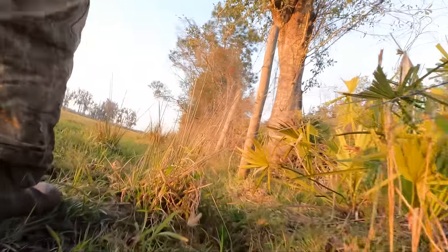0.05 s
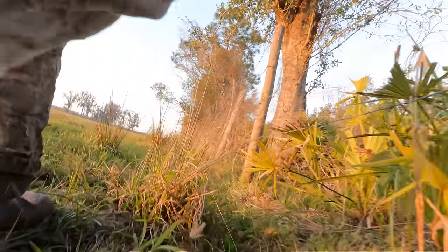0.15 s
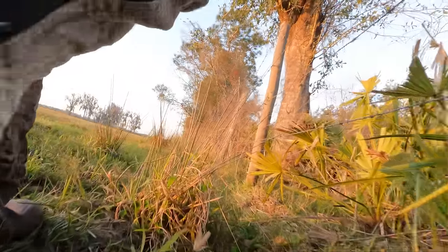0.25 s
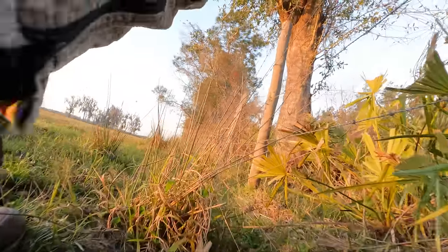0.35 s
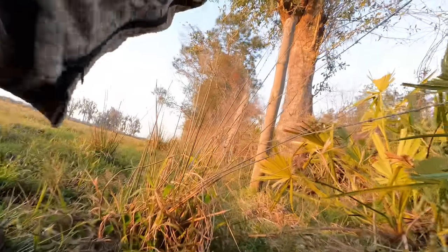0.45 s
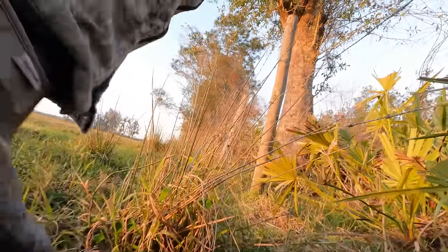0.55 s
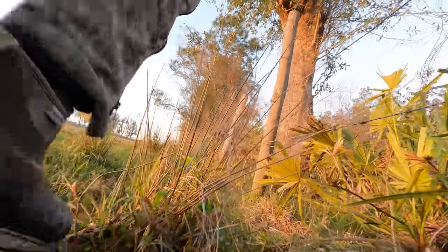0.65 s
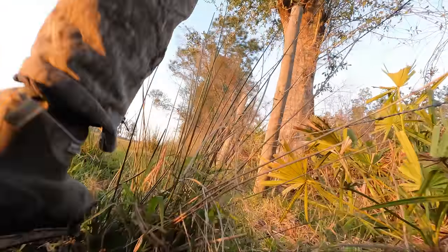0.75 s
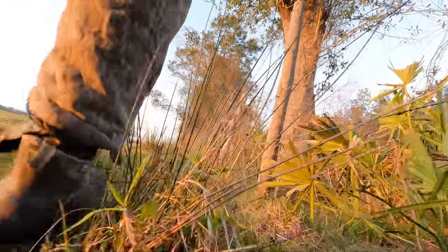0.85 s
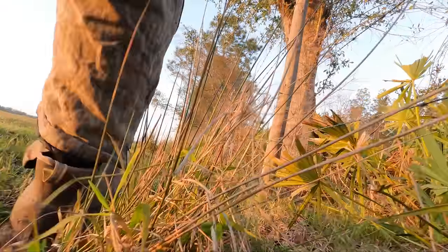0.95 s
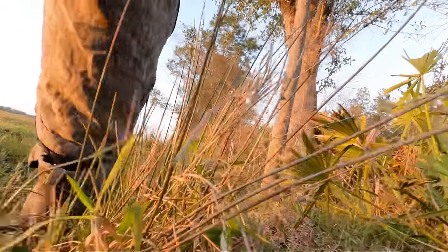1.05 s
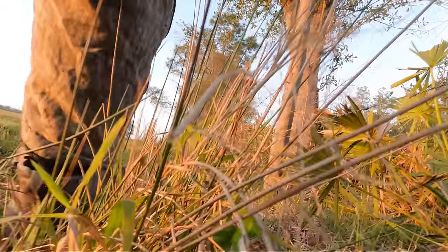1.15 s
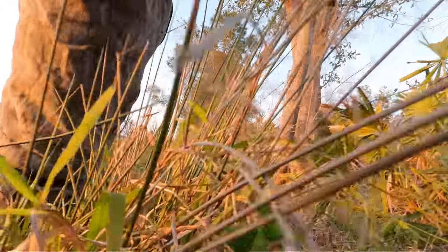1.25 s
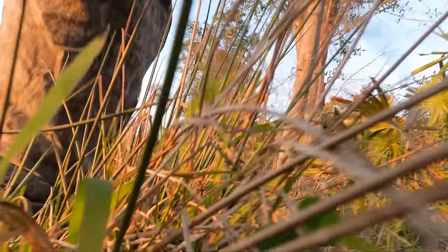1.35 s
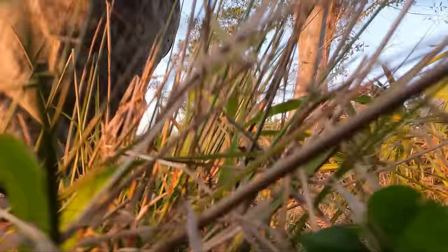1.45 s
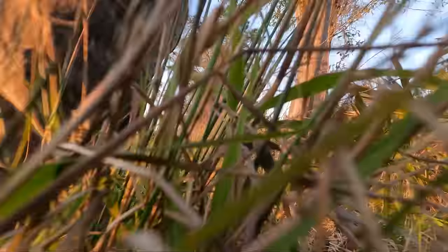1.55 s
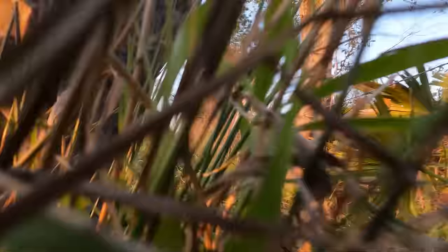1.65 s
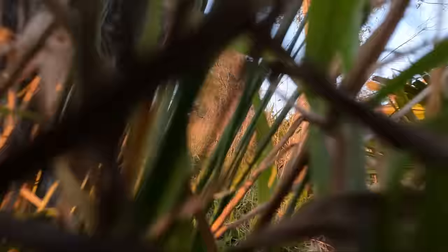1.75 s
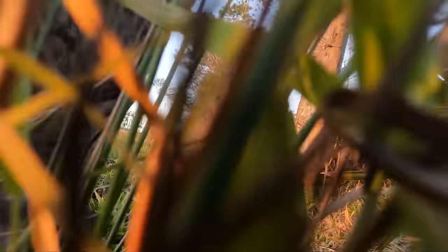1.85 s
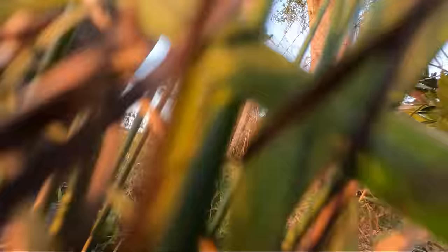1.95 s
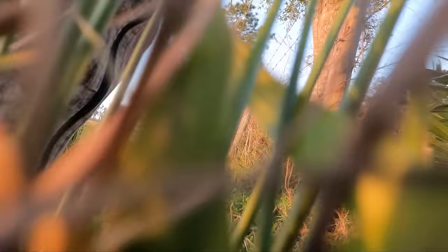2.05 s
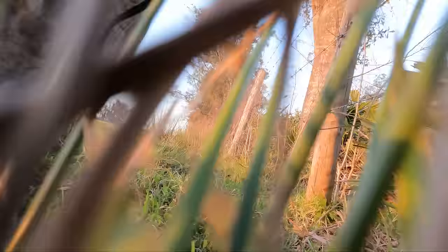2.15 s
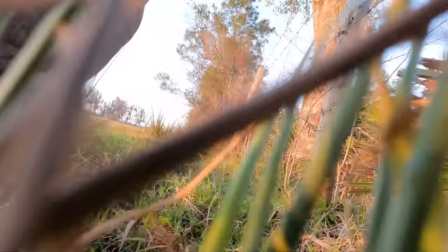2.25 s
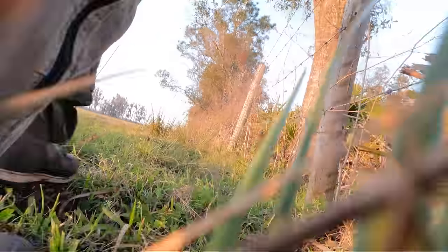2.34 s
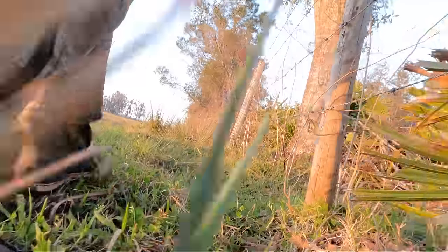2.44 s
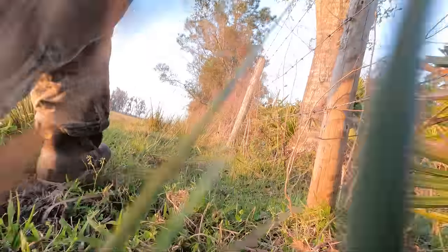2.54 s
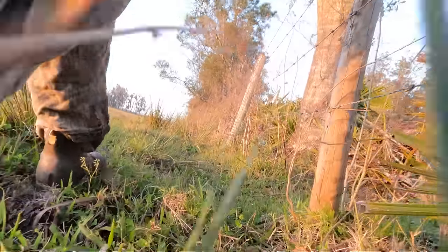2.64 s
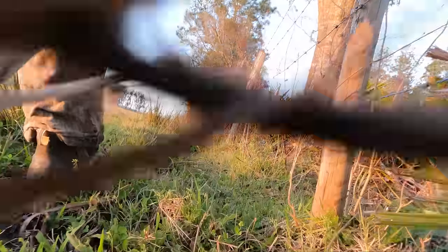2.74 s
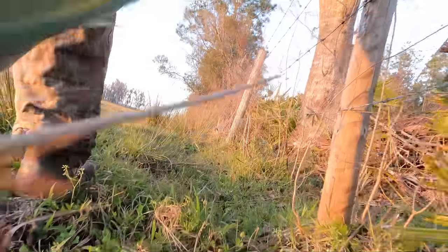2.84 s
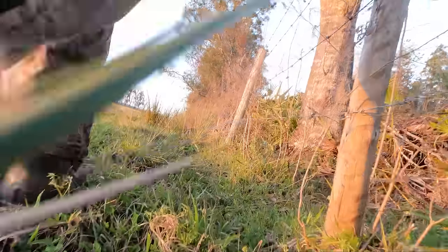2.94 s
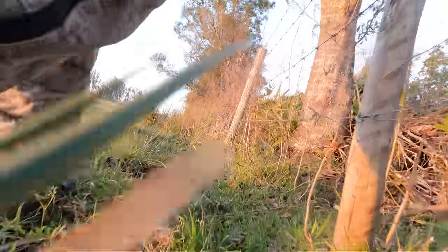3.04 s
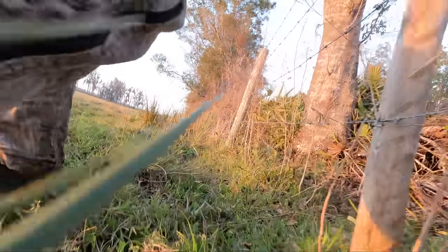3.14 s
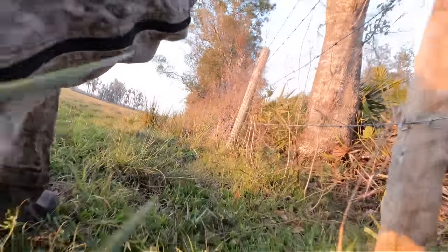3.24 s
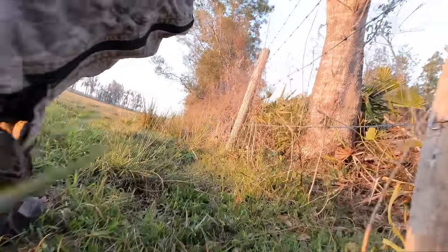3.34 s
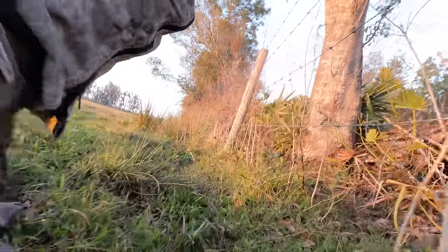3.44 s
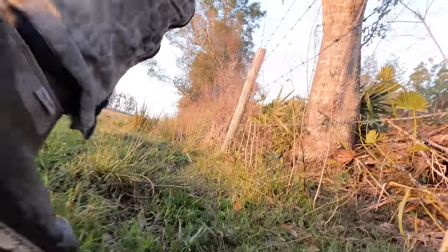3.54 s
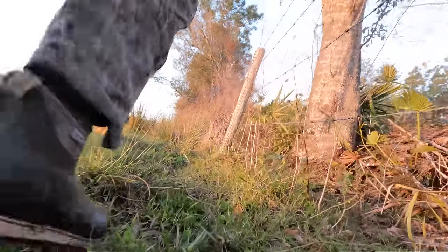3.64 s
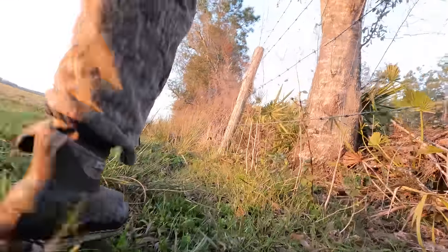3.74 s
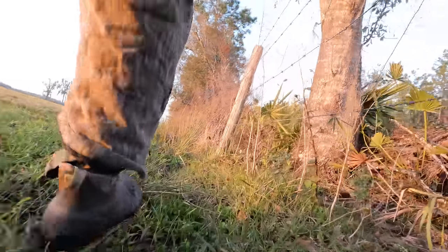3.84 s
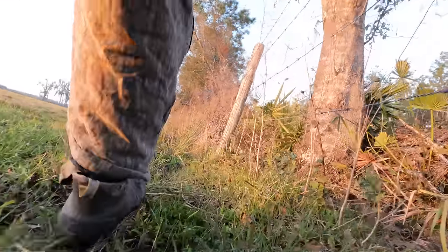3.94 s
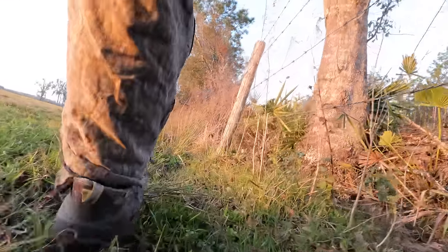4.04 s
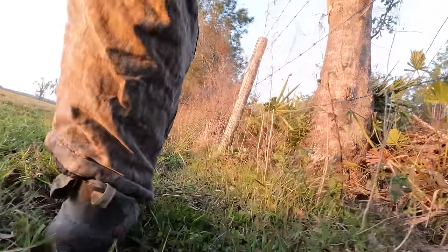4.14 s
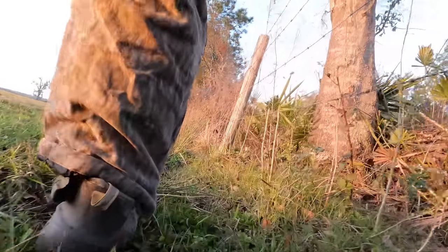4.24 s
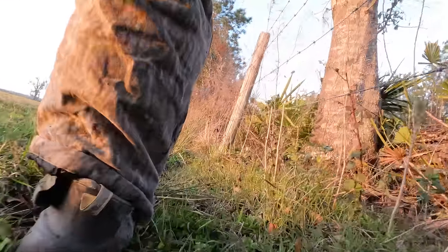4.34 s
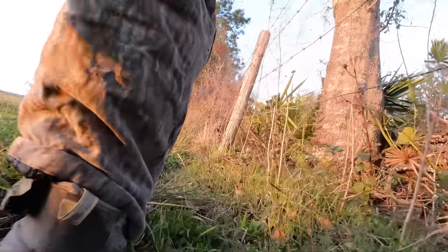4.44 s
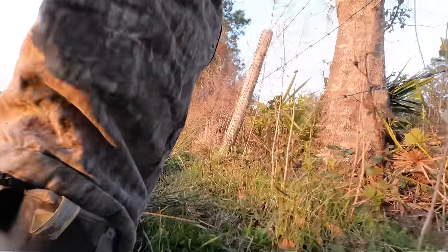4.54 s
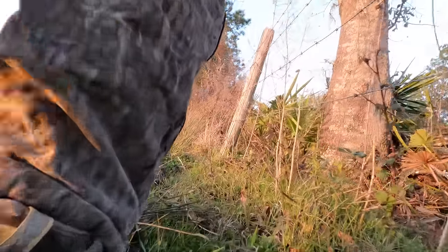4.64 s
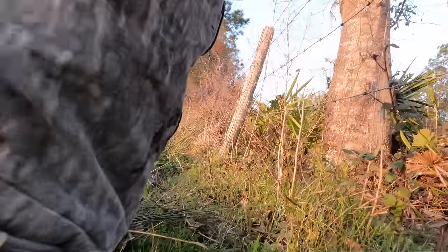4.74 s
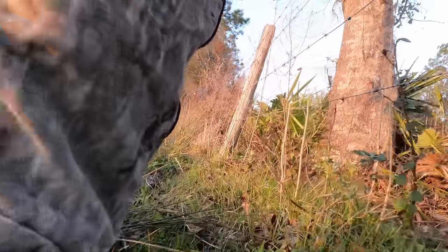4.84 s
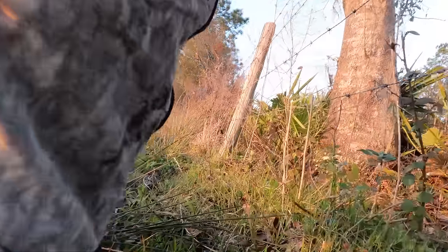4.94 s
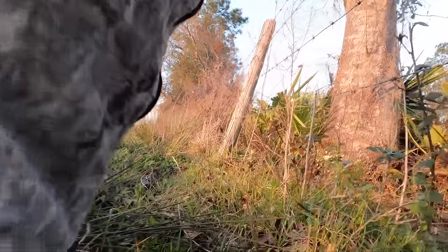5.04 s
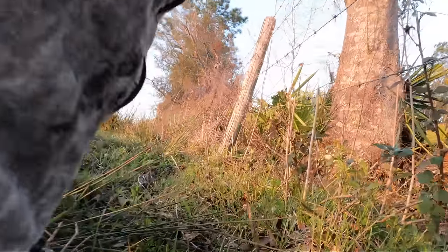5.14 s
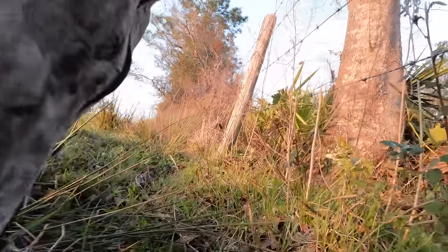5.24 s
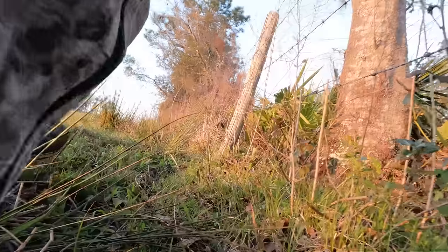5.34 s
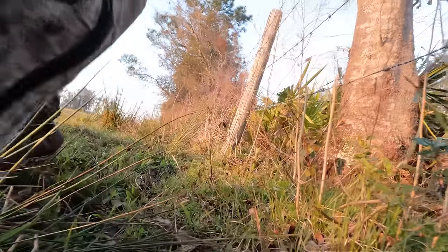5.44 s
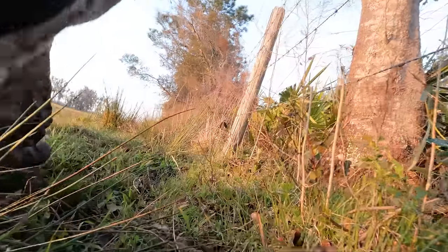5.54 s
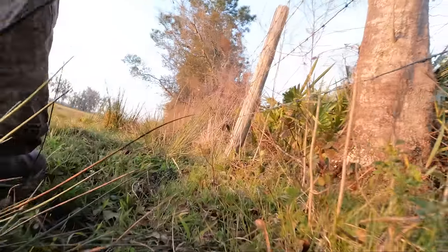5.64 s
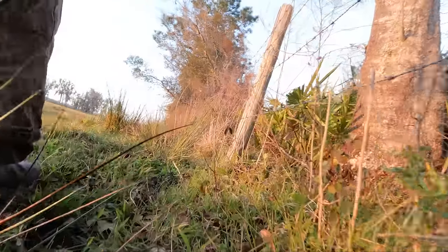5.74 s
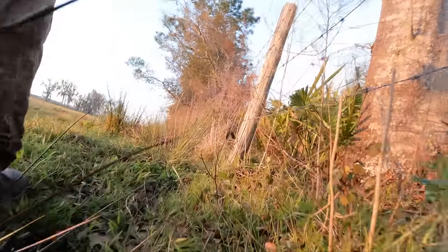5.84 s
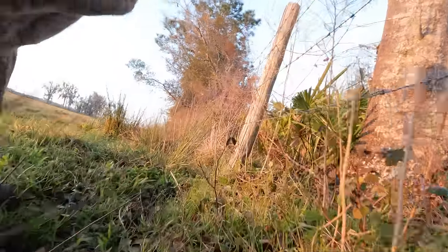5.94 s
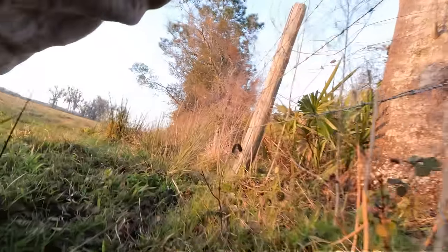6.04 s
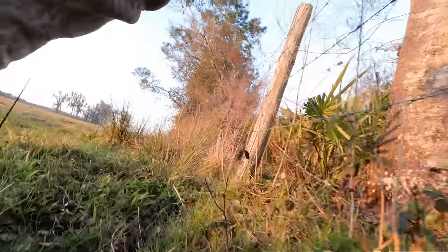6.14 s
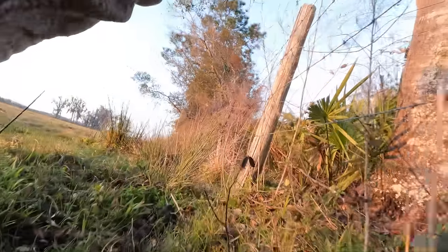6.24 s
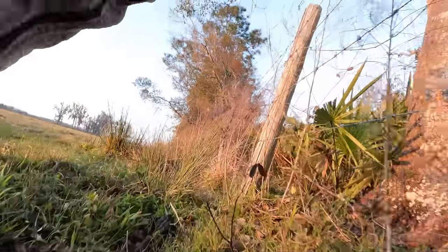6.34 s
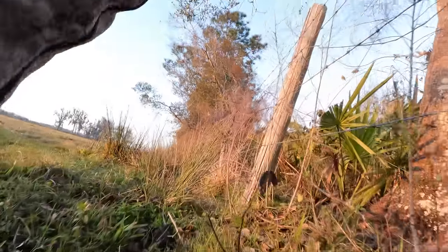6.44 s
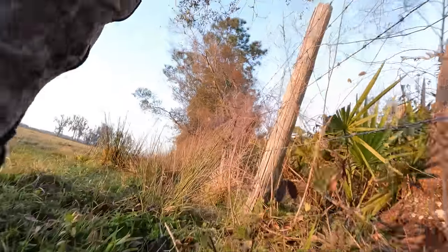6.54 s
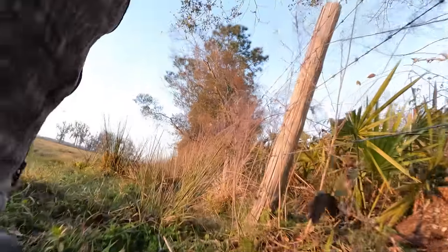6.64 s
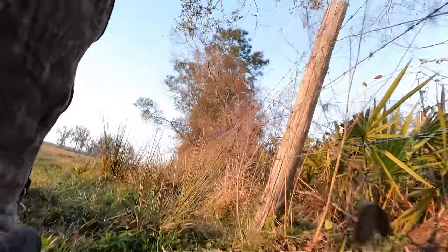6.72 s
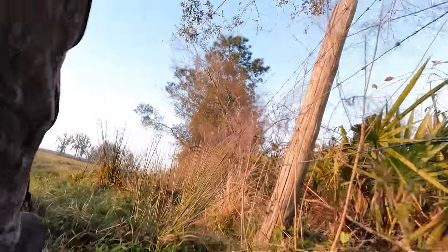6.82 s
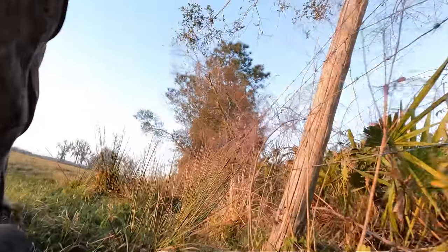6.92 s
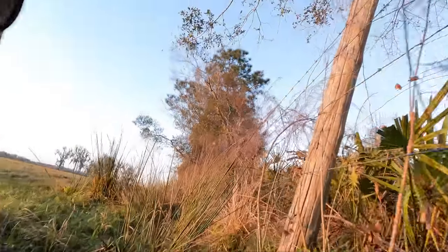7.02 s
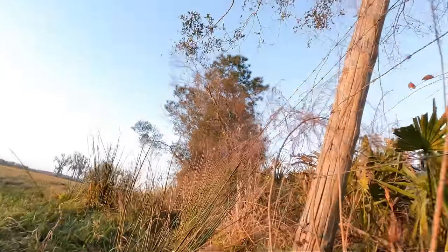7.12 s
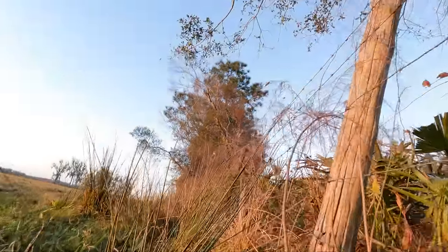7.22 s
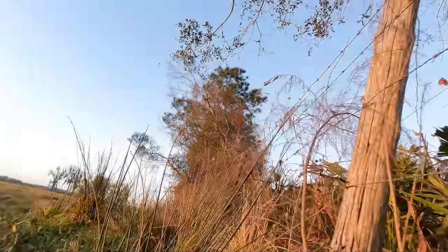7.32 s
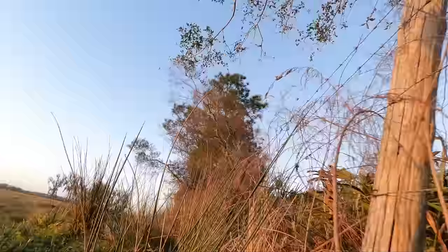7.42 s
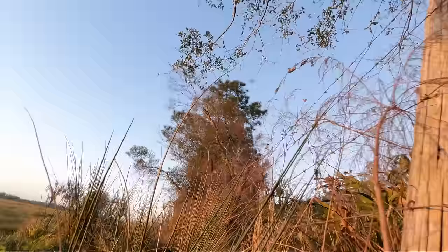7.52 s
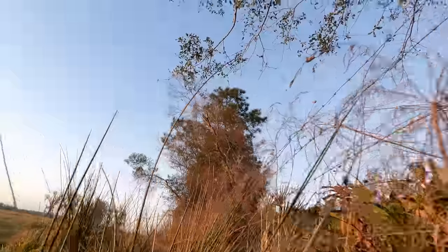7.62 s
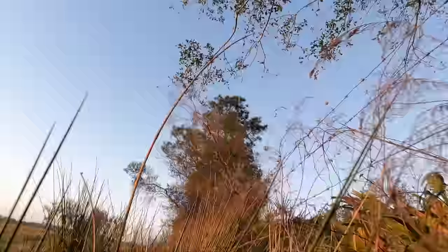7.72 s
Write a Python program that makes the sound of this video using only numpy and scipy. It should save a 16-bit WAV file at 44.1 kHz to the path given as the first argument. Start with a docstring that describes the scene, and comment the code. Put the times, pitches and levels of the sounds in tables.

```python
"""Walking through grass and brush

Someone in boots crosses a pasture, carrying a camera on a pole just above the ground. Grass and
trouser cloth swish as they catch and slip, stems scrape, flick and knock on the housing, and boots
thud on the turf. A thicket drags across the housing and shakes the pole. A low drone, like a far
engine, and a faint hiss lie under it all; the microphone is dull above 7 kHz."""
import sys
import numpy as np
from scipy import signal
from scipy.fft import rfft, irfft, next_fast_len
from scipy.io import wavfile

SR = 44100
rng = np.random.default_rng(int(sys.argv[2]) if len(sys.argv) > 2 else 0)


def store_wav(level_fs):
    """Save 16-bit WAV to argv[1]."""
    pcm = np.round(np.clip(np.atleast_2d(level_fs), -1, 1) * 32767)
    wavfile.write(sys.argv[1], SR, pcm.T.astype(np.int16))


N = 343053
T = np.arange(N) / SR
FFT_SIZE = next_fast_len(N)
FREQS = np.maximum(np.fft.rfftfreq(FFT_SIZE, 1 / SR), 1)

# The two tones of the drone: (pitch [Hz], level [dB])
DRONE_TONES = [(37.7, -37), (75.4, -53)]
# Tone colour of the open air: (frequency [Hz], relative level [dB])
AIR_COLOUR = [(35, -28), (60, -2.5), (114, 2.5), (129, -21), (348, -26), (465, -28), (1420, -27),
              (4170, -52.5), (8420, -64.5), (10900, -84), (18500, -120)]
# Tone colour of rubbing grass: (frequency [Hz], relative level [dB])
GRASS_COLOUR = [(130, -0.5), (300, -4), (700, -7.5), (1000, -8.5), (1650, -8.5), (2300, -11.5), (3200, -15),
                (3900, -16.5), (4700, -23), (5600, -30), (6250, -27.5), (7000, -30), (7900, -34.5),
                (8700, -39.5)]
# Tufts and trouser cloth sweeping past. Body is the lows and crispness the highs, relative to the level:
# (peak time [s], rise [s], fall [s], level [dB], body [dB], crispness [dB])
SWISHES = [(.004,.087,0.21,-47,2.5,-4.5),(.186,0.11,0.13,-43,-6,-8.5),(.297,0.069,0.15,-50.5,7,-3.5),(.445,0.09,0.087,-48,4,-8.5),(.863,0.088,0.038,-41,3,-10),(.978,0.1,0.32,-45,-5,-2),(1.119,0.056,0.074,-38.5,-0.5,0.5),(1.486,0.12,0.074,-36.5,0.5,-5),(3.16,.015,0.11,-33.5,-4.5,-10),(3.435,.106,.065,-37,-6,-4),(3.853,.28,0.091,-42,1,-5.5),(4.079,0.085,0.13,-42.5,4,-2.5),(4.3,0.15,0.12,-41,1.5,-3),(4.5,0.13,0.47,-43.5,-3,-6),(4.7,0.067,.14,-40,-2.5,-1),(5.153,0.18,0.34,-46.5,0,-5.5),(5.658,0.19,0.72,-48,-8,-6.5),(5.951,0.15,0.081,-46,4,1),(6.11,0.074,0.49,-40.5,-3.5,-6),(6.285,0.037,0.091,-38.5,-8,1),(6.335,.04,0.11,-39.5,4.5,-3.5),(6.565,0.35,0.09,-48.5,2.5,-10),(6.72,0.051,0.096,-43,1.5,-9),(6.941,0.015,0.17,-37.5,1,-4.5),(7.064,0.036,0.074,-38,0,3),(7.22,0.046,.1,-37,2,-0.5),(7.48,0.079,.11,-42.5,2.5,-4),(7.76,0.077,0.11,-53.5,1.5,-6)]
# The thicket dragging over the housing: (time [s], level [dB], body [dB], crispness [dB])
THICKET_DRAG = [(1.5,-52.5,9.5,-4),(1.7,-33.5,0,-0.5),(1.82,-30.5,-3,-3.5),(2.0,-31.5,-2.5,-1.5),(2.09,-24.5,-3,-2.5),(2.26,-27.5,-5,-1.5),(2.52,-35.5,1,-1),(2.81,-29,2,-4),(2.92,-31,6.5,-4.5),(3.02,-27.5,1,-4),(3.11,-39.5,-0.5,-1.5),(3.5,-41.5,-3,0),(3.8,-64,16,-16)]
# Tone colour of the swaying pole: (frequency [Hz], relative level [dB])
SWAY_COLOUR = [(3, 0), (9, 1), (15, -1), (28, -3), (45, -9), (70, -18), (120, -40)]
# Tone colour of the pole when shaken hard: (frequency [Hz], relative level [dB])
JUDDER_COLOUR = [(28, -19.5), (42, 2), (62, 0.5), (85, 0), (125, -9.5), (180, -28), (300, -47)]
# The pole shuddering when it is caught: (time [s], peak level [dB], pitch [Hz])
SHUDDERS = [(0.0,-30.5,86.8),(0.97,-33,89),(1.604,-26.5,90),(1.759,-18.5,88.5),(1.843,-11,85),(2.092,-6.5,88.5),(2.45,-13.5,80.8),(2.621,-13.5,85.6),(2.80,-15.5,80),(2.899,-17.5,89),(3.04,-13.5,71.3),(3.255,-21,85.3),(3.604,-23,89.7),(3.64,-19,86.3),(5.051,-34,77.8)]
# Stalks scraping along the housing: (time [s], length [s], level [dB], pitch [Hz])
STALK_SCRAPES = [(0.163,0.0297,-34.5,1110),(0.44,0.027,-36.5,1110),(1.10,0.058,-38,2780),(1.742,.036,-28.5,1380),(1.841,0.021,-27.5,2000),(2.054,0.024,-26.5,2240),(2.881,0.044,-29,1120),(2.917,0.044,-24.5,650),(2.991,0.034,-27.5,1970),(3.416,.01,-34,1950),(6.927,0.015,-44.5,1300)]
# Dry stems flicking the housing: (time [s], peak level [dB], pitch [Hz], band width [ratio])
STEM_FLICKS = [(0.288,-31.5,2690,1.2),(1.127,-17.5,2460,2.6),(1.459,-27,2360,2),(1.522,-26.5,2890,.6),(1.661,-8.5,3600,0.51),(1.7045,-14,3200,1.6),(1.709,-18.5,2400,0.55),(1.885,-16,2640,0.63),(2.633,-18.5,2920,0.38),(3.018,-15,3600,0.13),(3.147,-23,2820,0.37),(4.202,-29,2440,.5),(4.284,-25.5,2020,.73),(4.737,-24.5,2240,0.27),(5.06,-29,2270,1.5),(5.639,-25.5,2480,0.76),(5.841,-33.5,2080,0.38),(7.079,-23,3170,0.71),(7.187,-19.5,3570,0.46),(7.2155,-16,3260,.88),(7.249,-19.5,3160,0.65),(7.262,-19,3930,0.57),(7.464,-24.5,3420,0.38)]
# Boots and clumps of turf thudding: (time [s], peak level [dB], pitch [Hz], band width [ratio])
BOOT_THUDS = [(0.686,-36,130,0.65),(1.095,-20,119,0.44),(2.058,-12.5,285,0.47),(2.93,-17,330,0.92),(3.008,-21.5,176,0.26),(4.195,-25,65.5,0.54),(4.294,-19.5,191,0.58),(5.056,-32.5,230,0.57),(5.285,-35,255,0.45),(6.325,-23,257,0.93),(6.56,-31.5,447,0.2),(6.705,-28,123,0.58),(7.215,-29,278,0.42),(7.685,-37.5,119,0.17)]
# Thick stalks and boot leather knocking: (time [s], relative level [dB], pitch [Hz], band width [ratio])
STALK_KNOCKS = [(1.439,-23.5,780,0.22),(1.71,-9,970,0.86),(1.762,-8,1240,0.66),(2.061,-20,450,1.2),(2.599,-15.5,750,1.1),(2.825,-12,520,0.96),(2.936,-11.5,463,0.17),(3.002,-7.5,720,0.59),(3.163,-12.5,1060,0.27),(3.439,-15.5,1290,0.49),(3.571,-29,684,.1),(3.621,-20,990,0.54),(3.628,-23.5,706,0.078),(3.688,-29,1110,0.26),(4.09,-23.5,633,0.24),(4.151,-24,460,.36),(4.201,-23.5,805,0.77),(4.282,-22,600,1.3),(4.298,-20,443,0.96),(5.061,-23,756,0.95),(5.842,-25.5,594,0.53),(6.021,-17.5,684,0.55),(6.274,-19.5,1130,1.6),(6.426,-25.5,820,1),(6.568,-30,432,0.29),(6.928,-28,920,0.37),(6.974,-22.5,360,0.74),(7.125,-22,764,0.55)]

STILL_DB, STILL_BODY_DB, STILL_CRISP_DB = -64, 4, -7  # grass stirring faintly between swishes
DULL_FROM_S, DULL_UNTIL_S = 2.024, 5.1  # from the thicket on, the treble is muffled for a while
DULL_CLOSE_S, DULL_OPEN_S, DULL_DB = 0.14, 0.72, -14  # how fast the muffling comes and goes; its depth
SWAY_DRAG_DB, SWAY_FULL_AT_DB = -18, -30.5  # most sway from dragging, and the rustle that brings it
SWAY_WALK_DB, SWAY_SETTLE_S = -41.5, 0.17  # sway from walking alone; time the pole takes to settle


def undb(db):
    """Turn decibels into a gain."""
    return 10 ** (np.asarray(db) / 20)


def unit(x):
    """Scale a sound to an average (rms) level of 1."""
    return x / np.sqrt(np.mean(x ** 2))


def shape(x, gain):
    """Give each frequency its own gain, then scale to level 1."""
    return unit(irfft(rfft(x, FFT_SIZE) * gain, FFT_SIZE)[:N])


def colour(x, points):
    """Give a sound the tone colour in a table, cutting what lies past its ends."""
    hz, db = np.transpose(points)
    return shape(x, undb(np.interp(np.log(FREQS), np.log(hz), db, left=-90, right=-90)))


def zone(x, lo, hi):
    """Keep lo to hi Hz at level 1, with soft edges so that neighbouring zones leave no gap."""
    below_lo, below_hi = (1 / (1 + (FREQS / hz) ** (8 + hz / 400)) for hz in (lo, hi))
    return shape(x, below_hi - below_lo)


def band(x, lo, hi, order=2):
    """Let through the frequencies from lo to hi Hz."""
    return signal.sosfilt(signal.butter(order, [lo, hi], "band", fs=SR, output="sos"), x)


def wander(rate):
    """Glide between random values of size about 1, rate times a second."""
    steps = rng.standard_normal(N // 20)
    return np.interp(T * rate, np.arange(len(steps)), steps)


def crackle(rate, spread_db, count=30000):
    """Tiny random slips, about rate a second, most weak and a few strong."""
    place, chance, direction = rng.random((count, 3)).T
    size = undb(spread_db * np.minimum(rng.exponential(size=count), 4))
    happens = chance < rate * T[-1] / count
    slips = happens * np.sign(direction - .5) * size
    return unit(np.bincount((place * N).astype(int), slips, N))


def add(out, s, x):
    """Mix a short sound in at s seconds."""
    i = int(s * SR)
    out[i:i + len(x)] += x[:N - i]


def drone():
    """Two low tones waver slightly, like a far engine."""
    turns = np.cumsum(1 + 0.017 * wander(4.2)) / SR
    return sum(undb(db + 0.73 * wander(2.6)) * unit(np.sin(2 * np.pi * hz * turns))
               for hz, db in DRONE_TONES)


def open_air(level_db=-55):
    """The open air adds a faint, steady rumble and hiss."""
    return undb(level_db) * colour(rng.standard_normal(N), AIR_COLOUR)


def brushing():
    """Work out the rustle's level, body and crispness in dB as tufts pass and the thicket drags."""
    t = T[::64]  # these change slowly, so coarse steps will do
    times, *columns = np.transpose(THICKET_DRAG)
    level_db, body_db, crisp_db = (np.interp(t, times, column) for column in columns)
    in_thicket = (t > times[0]) & (t < times[-1])
    power = (in_thicket * undb([level_db, level_db + body_db, level_db + crisp_db])) ** 2
    power += undb([[STILL_DB], [STILL_DB + STILL_BODY_DB], [STILL_DB + STILL_CRISP_DB]]) ** 2
    for s, rise_s, fall_s, db, body, crisp in SWISHES:
        from_peak = np.maximum((s - t) / rise_s, (t - s) / fall_s).clip(0, 20)
        swell = np.exp(-from_peak ** 1.05)  # a power of 1 gives a pointed crest, 2 a bell
        power += np.outer(undb([db, db + body, db + crisp]), swell) ** 2
    middle, low, high = (np.interp(T, t, 10 * np.log10(p)) for p in power)
    return middle, low - middle, high - middle


def grass_blades(pressed):
    """Countless blades catch and slip, each with its own tick; pressed hard, they merge into a rub."""
    shared_ticks, out = crackle(rate=450, spread_db=1.5), 0
    loose = 1 - .5 * pressed
    for k in range(13):
        hz = 125 * 2 ** (k / 2)  # bands half an octave apart
        ticks = 0.52 * shared_ticks + 0.95 * crackle(rate=80 + hz / 6, spread_db=3.5)
        rub = np.sqrt(1 - (0.35 * loose) ** 2) * rng.standard_normal(N)
        friction = band(0.79 * loose * ticks + rub, hz / 2 ** .25, hz * 2 ** .25)
        out += (-1) ** k * friction * undb(1.71 * wander(35))  # flipping signs joins the bands smoothly
    flutter_db = loose * (1.13 * wander(45) + 1.23 * wander(260))
    return colour(out * undb(flutter_db), GRASS_COLOUR)


def swish(level_db, body_db, crisp_db):
    """Leaves pressed on the housing sound full and dull; dry tips brushing by sound thin and crisp."""
    friction = grass_blades(pressed=np.clip((level_db + 32) / 10, 0, 1))
    closing = (T - DULL_FROM_S) / DULL_CLOSE_S
    opening = (DULL_UNTIL_S - T) / DULL_OPEN_S
    muffled = np.minimum(closing, opening).clip(0, 1)
    edge_db = -15.5 + 1.3 * crisp_db + DULL_DB * muffled
    fizz_db = 1.68 * edge_db - 3  # muffling takes the very top first
    # (from [Hz], to [Hz], boost [dB])
    zones = [(102, 660, body_db - .4), (638, 2160, 0.013), (2296, 6070, crisp_db),
             (5560, 7100, edge_db), (7500, 11000, fizz_db)]
    return sum(zone(friction, lo, hi) * undb(level_db + db - 1.11) for lo, hi, db in zones)


def pole_sway(rustle_db):
    """The pole sways as the plants drag on it, and judders when shaken hard."""
    memory = np.exp(-1 / (SWAY_SETTLE_S * SR))
    drag_db = 10 * np.log10(signal.lfilter([1 - memory], [1, -memory], undb(rustle_db) ** 2))
    dragged_db = SWAY_DRAG_DB + 1.35 * np.minimum(drag_db - SWAY_FULL_AT_DB, 0)
    sway_db = 20 * np.log10(np.hypot(undb(dragged_db), undb(SWAY_WALK_DB)))
    judder_db = 1.285 * sway_db - 0.07  # grows faster than the sway
    sway = undb(sway_db) * colour(rng.standard_normal(N), SWAY_COLOUR)
    judder = undb(judder_db) * colour(rng.standard_normal(N), JUDDER_COLOUR)
    return sway + judder


def pole_shudders(rise_s=0.0053, ring_s=0.36):
    """Each time it is caught, the pole bends to and fro with a low note that swells and dies away."""
    out, t = np.zeros(N), T[:SR // 2]
    swell = (1 - np.exp(-t / rise_s)) ** 2 * undb(-60 * t / ring_s)
    for s, db, hz in SHUDDERS:
        add(out, s, undb(db) * swell / swell.max() * np.sin(2 * np.pi * hz * t))
    return out


def stalk_scrapes():
    """A stalk sticks and slips along the housing for a few hundredths of a second."""
    out, slips = np.zeros(N), crackle(rate=3500, spread_db=2.5)
    for s, length_s, db, hz in STALK_SCRAPES:
        stroke = signal.windows.tukey(int(length_s * SR), .25)
        rub = band(slips[int(s * SR):][:len(stroke)], hz / 2.53, hz * 1.4)
        add(out, s, undb(db) * unit(rub * stroke))
    return out


def strikes(table, ring_s, rise_s, slip, crack_db):
    """Each hit is one sharp slip and a fading burst of smaller ones, heard as a ring and a crack."""
    out, t = np.zeros(N), T[:SR // 4]
    for s, db, hz, width in table:
        width = max(width, .1)
        fade_s = ring_s / width ** 0.18  # a narrower band rings longer
        burst = rng.standard_normal(len(t)) * (1 - np.exp(-t / rise_s)) * undb(-60 * t / fade_s)
        burst[int(2 * rise_s * SR)] += slip * np.sqrt(np.sum(burst ** 2))
        ring = unit(band(burst, hz / (1 + width), hz * (1 + width)))
        crack = unit(band(burst, hz / 4, hz * 3, order=1))
        hit = ring + undb(crack_db) * crack
        add(out, s, undb(db) * hit / np.abs(hit).max())
    return out


def stem_flicks():
    """Dry stems flick the housing with short, bright clicks."""
    return strikes(STEM_FLICKS, ring_s=.014, rise_s=.0007, slip=.47, crack_db=-12)


def boot_thuds():
    """Boots and clumps of turf land with soft, low thuds."""
    return strikes(BOOT_THUDS, ring_s=.047, rise_s=.0034, slip=.25, crack_db=-13)


def stalk_knocks():
    """Thicker stalks and boot leather knock, lower and longer than the flicks."""
    return undb(-3) * strikes(STALK_KNOCKS, ring_s=.028, rise_s=.001, slip=.63, crack_db=-21)


def scene():
    """One brushing motion drives rustle and sway; the housing softens the treble of hits and scrapes."""
    level_db, body_db, crisp_db = brushing()
    contacts = stem_flicks() + stalk_knocks() + boot_thuds() + stalk_scrapes()
    through_housing = band(contacts, 33, 5770, order=7)
    rustle = swish(level_db, body_db, crisp_db)
    pole = pole_sway(level_db) + pole_shudders()
    return (rustle + through_housing + pole + drone() + open_air())[None]


def record(dry):
    """The microphone loses the treble steeply above 8700 Hz."""
    return signal.sosfilt(signal.ellip(10, .2, 80, 8700, fs=SR, output="sos"), dry)


dry = scene()
out = record(dry)
store_wav(out)
```